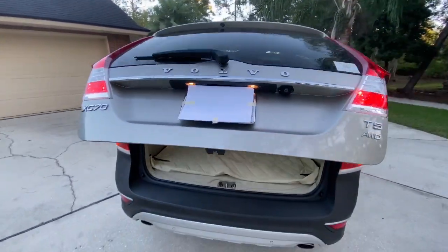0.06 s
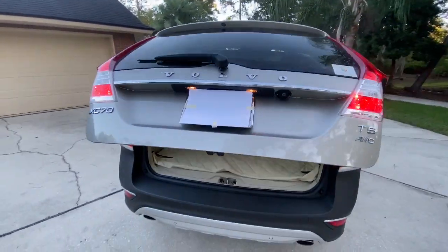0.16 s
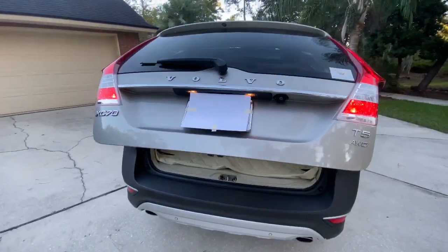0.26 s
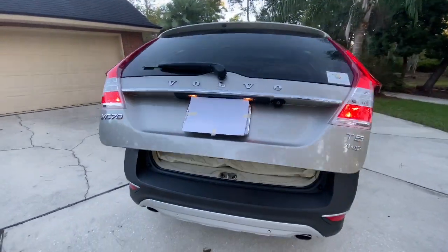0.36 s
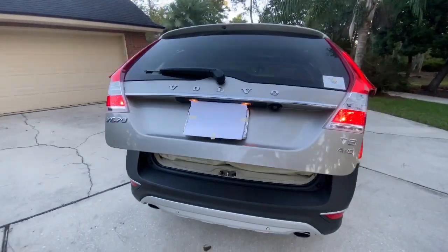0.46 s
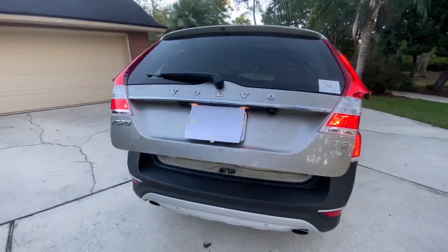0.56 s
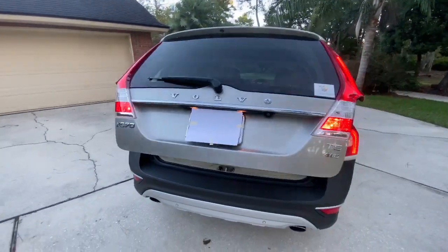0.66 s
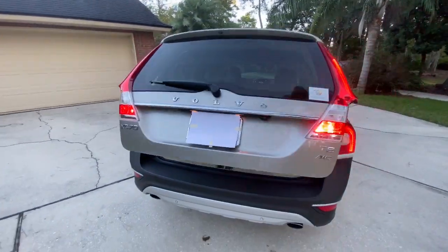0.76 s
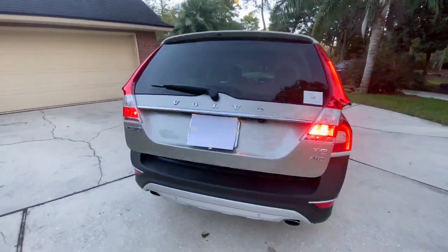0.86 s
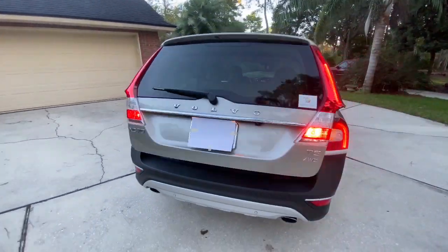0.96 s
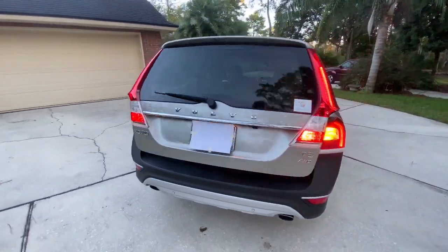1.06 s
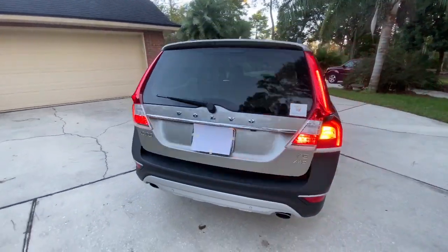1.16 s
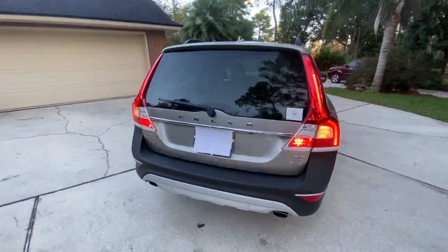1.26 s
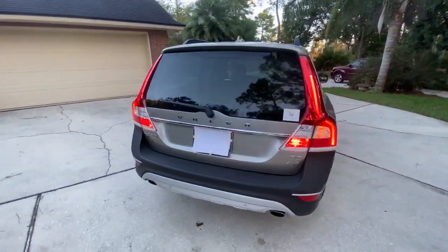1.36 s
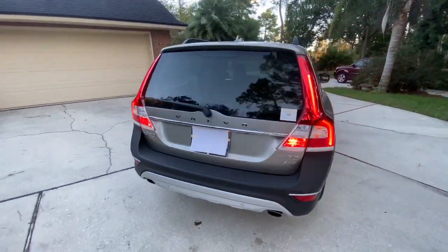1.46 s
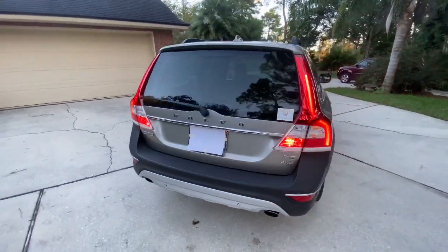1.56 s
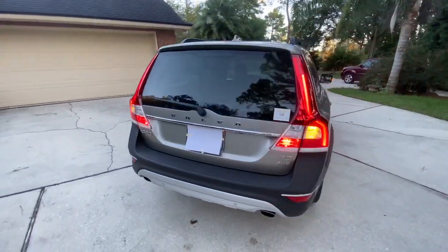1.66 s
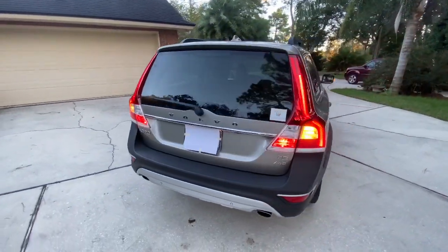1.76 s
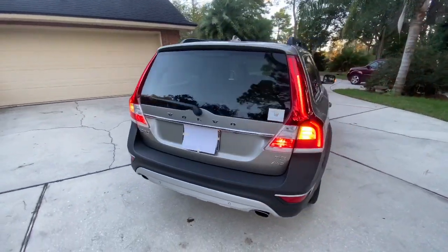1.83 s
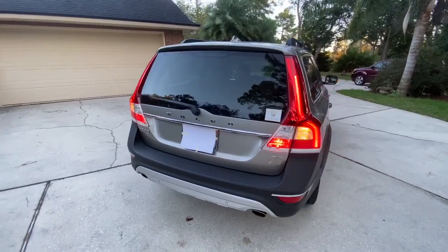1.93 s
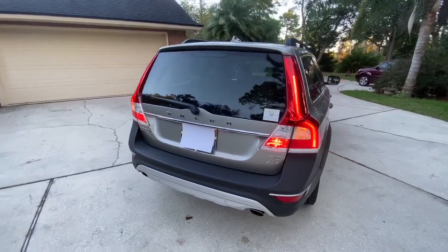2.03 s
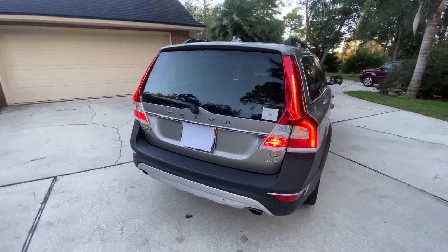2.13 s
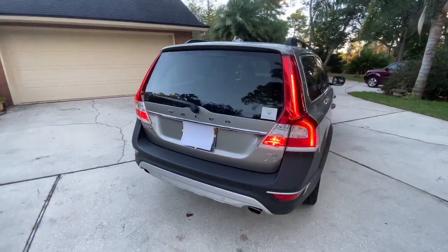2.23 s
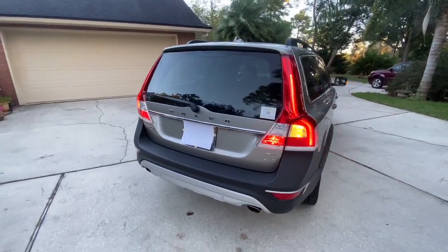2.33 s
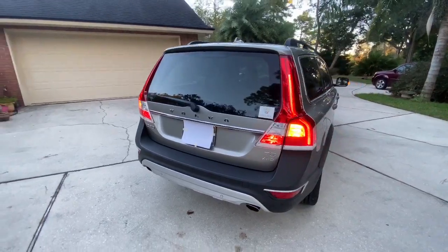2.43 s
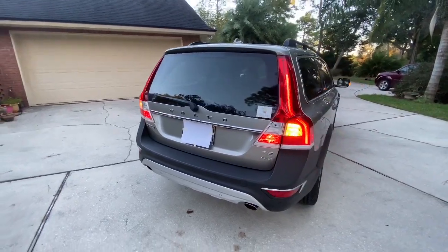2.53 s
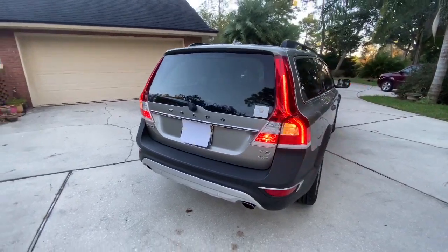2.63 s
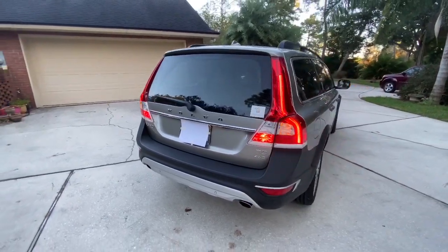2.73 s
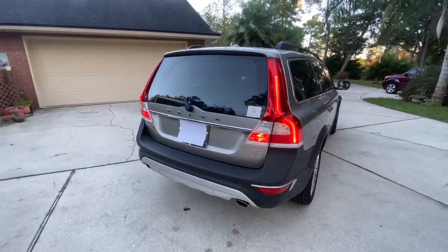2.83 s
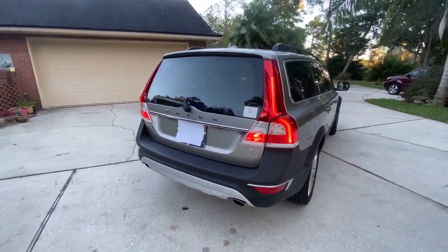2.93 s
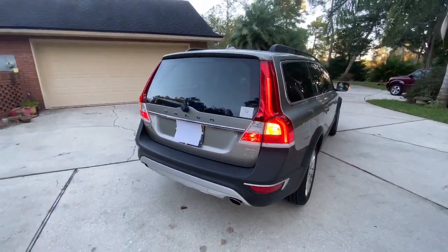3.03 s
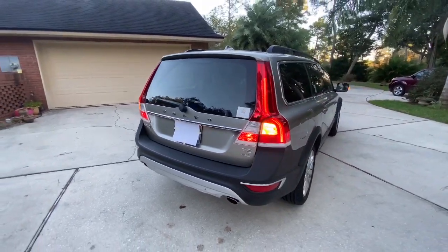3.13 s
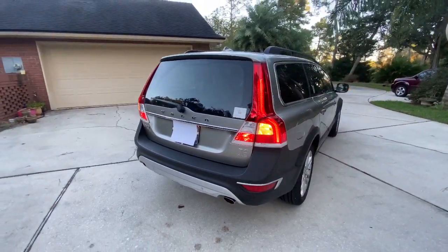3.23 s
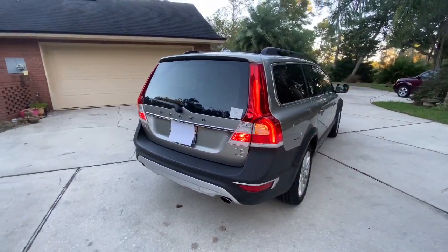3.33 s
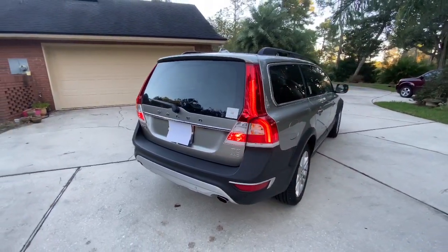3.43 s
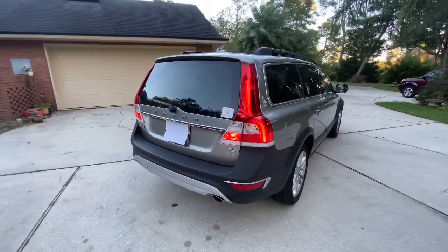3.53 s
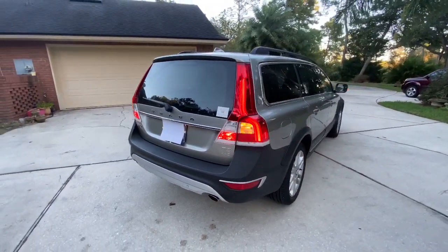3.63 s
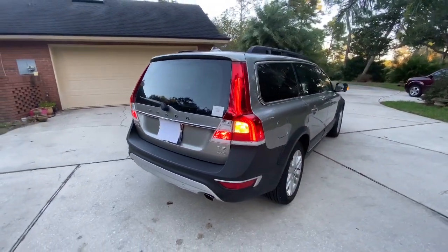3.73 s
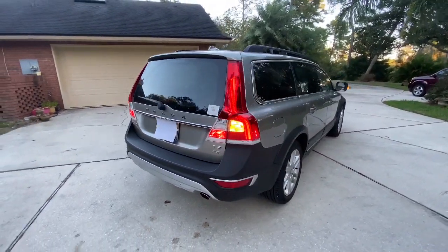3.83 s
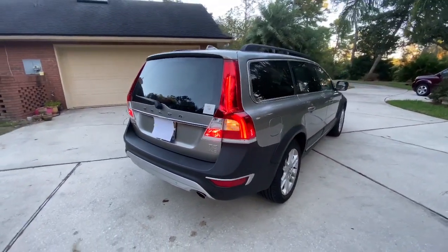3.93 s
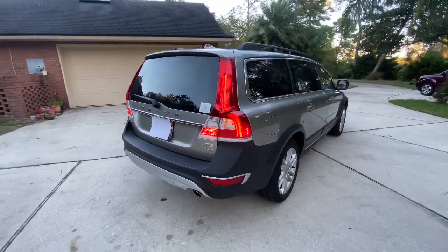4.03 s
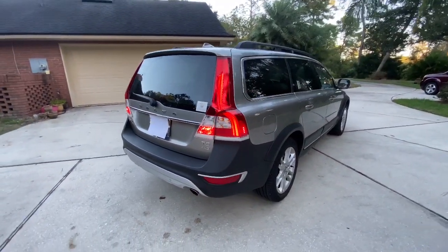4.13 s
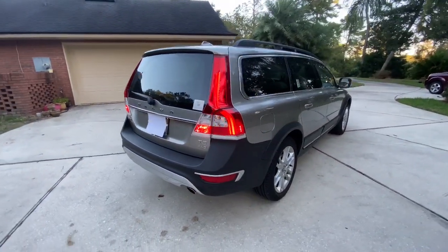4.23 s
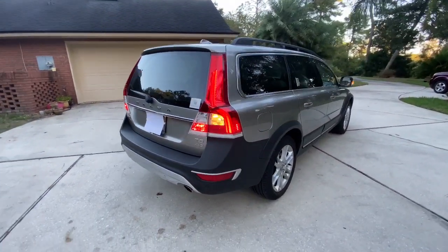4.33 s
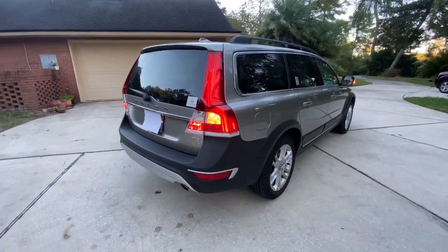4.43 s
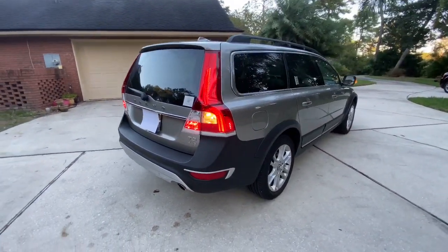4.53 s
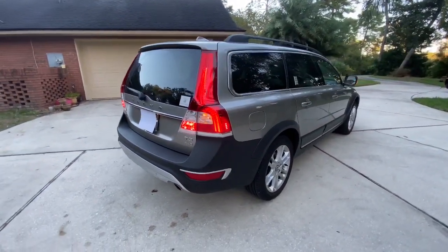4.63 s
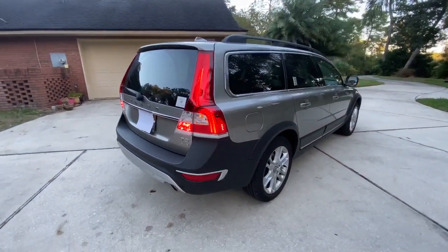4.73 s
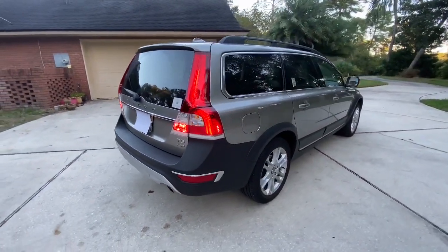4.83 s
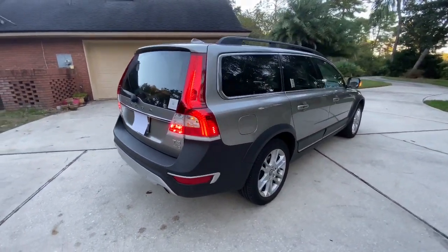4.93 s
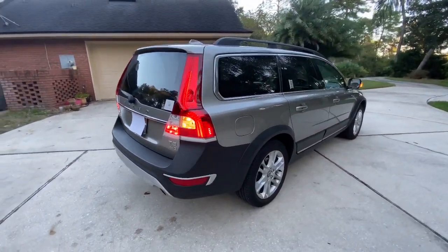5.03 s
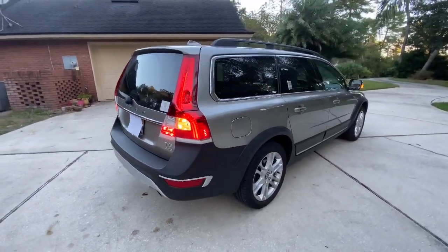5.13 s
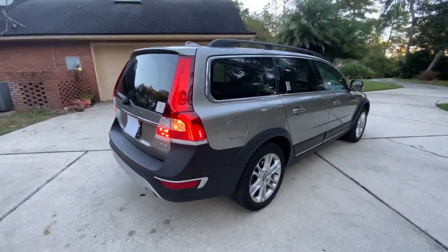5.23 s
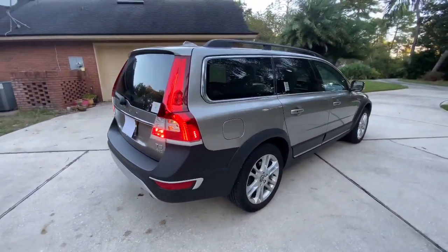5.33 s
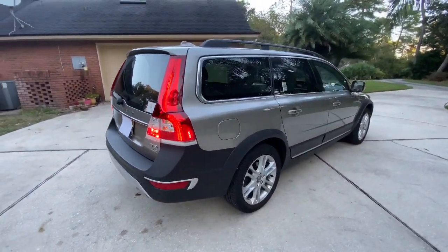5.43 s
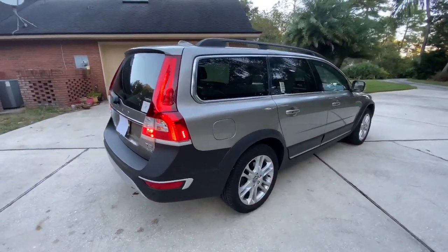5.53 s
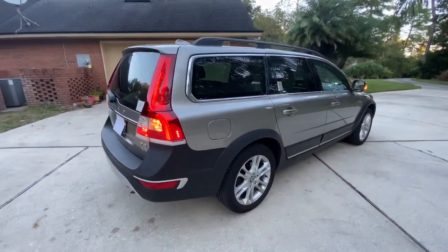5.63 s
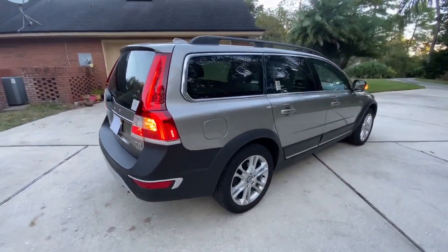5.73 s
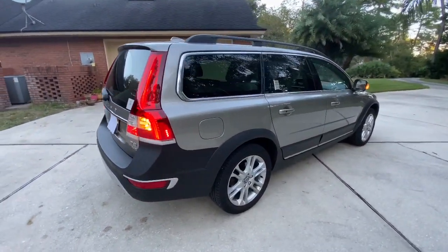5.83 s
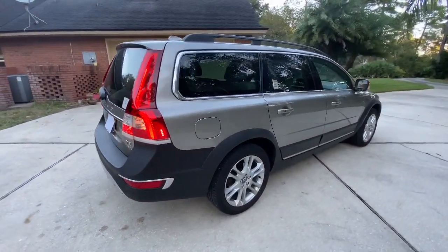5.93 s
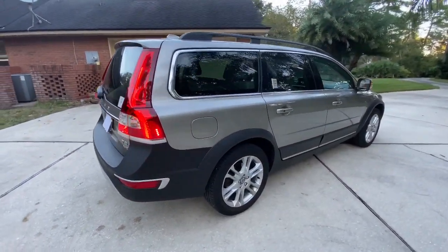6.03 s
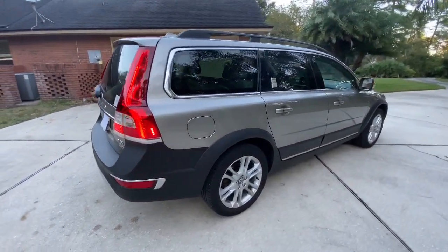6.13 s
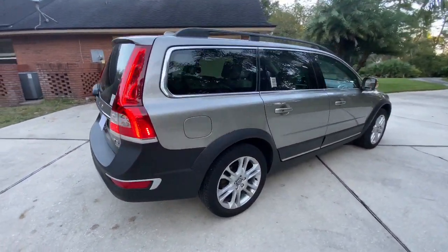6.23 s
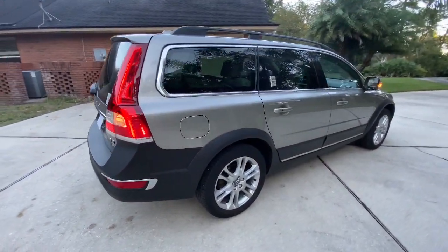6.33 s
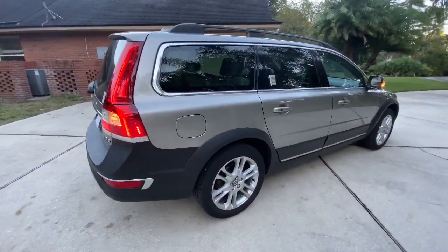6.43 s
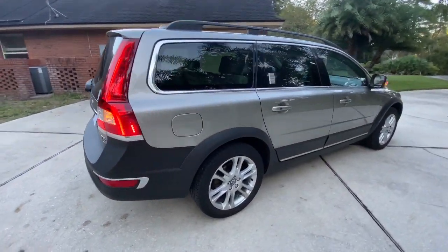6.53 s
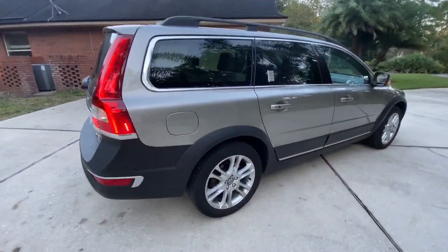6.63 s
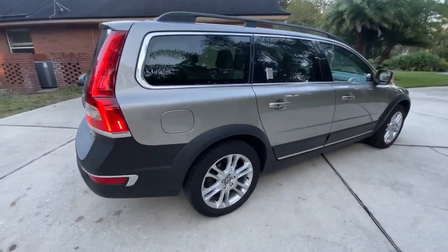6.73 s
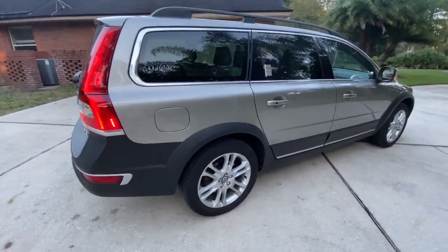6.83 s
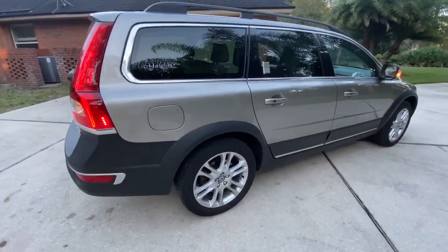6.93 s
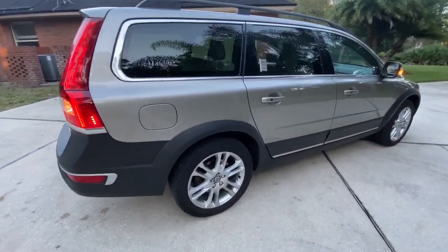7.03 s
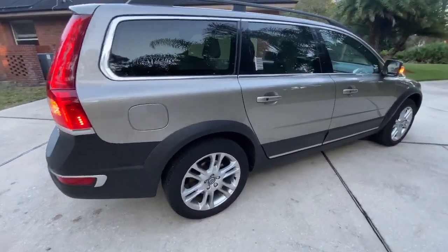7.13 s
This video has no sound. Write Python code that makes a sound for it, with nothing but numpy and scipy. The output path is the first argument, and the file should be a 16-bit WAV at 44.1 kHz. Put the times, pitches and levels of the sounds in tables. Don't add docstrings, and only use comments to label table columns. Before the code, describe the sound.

Outdoors, a low engine purr underlies a short electric motor whine and one solid tailgate thud, followed by steady idling that grows hissier.

```python
import sys
import numpy as np
from scipy import signal
from scipy.fft import rfft, irfft, next_fast_len
from scipy.io import wavfile

SR = 44100
rng = np.random.default_rng(int(sys.argv[2]) if len(sys.argv) > 2 else 0)


def file_out(sig):
    cols = np.atleast_2d(sig).T
    lim = np.clip(cols, -1, 1)
    pcm = np.round(lim * 32767).astype(np.int16)
    wavfile.write(sys.argv[1], SR, pcm)


def decibels_to_gain(level_db):
    exponent = np.asarray(level_db, float) / 20
    return 10 ** exponent


N = 316188
TIME = np.arange(N) / SR
PAD = next_fast_len(N + SR // 2)
HZ = np.maximum(np.arange(PAD // 2 + 1) * SR / PAD, 1)
FIRING_HZ, CYLINDERS = 29.93, 5


def in_time(rows):
    start_s, *columns = np.transpose(rows)
    return [np.interp(TIME, start_s, column) for column in columns]


def at_hz(points, hz, axis=1):
    points = np.array(points)
    return np.interp(np.log(hz), np.log(points[:, 0]), points[:, axis])


def rms_one(x):
    return x / np.sqrt(np.mean(x ** 2) + 1e-20)


def total_db(points):
    return 10 * np.log10(np.mean(decibels_to_gain(2 * at_hz(points, HZ))))


def drift(rate_hz):
    r = np.exp(-128 * np.pi * rate_hz / SR)
    chance = rng.standard_normal(N // 64 + 3002)
    slow = signal.lfilter([1], [1, -2 * r, r * r], chance)[3000:]
    return np.interp(np.arange(N) / 64, np.arange(len(slow)), rms_one(slow - slow.mean()))


def resonance(hz, width_hz):
    return 1 / (1 + (2 * (HZ - hz) / width_hz) ** 2)


# pitch_hz, in_phase [-1..1], quarter_cycle_ahead [-1..1]
LINK = [(60, 0.15, 0.71), (150, 0.3, 0.47), (300, 0.096, -0.43), (600, 0.49, -0.15), (890, -0.27, -0.53),
        (1290, 0.41, -0.59), (1800, 0.65, -0.3), (2500, 0.39, -0.19), (3500, 0.11, -0.03),
        (5200, 0.56, 0.11), (7000, 0.079, -0.08), (10000, -0.12, 0.12)]


def side_of(mid, other):
    link = at_hz(LINK, HZ) + 1j * at_hz(LINK, HZ, axis=2)
    return link * mid + np.sqrt(np.clip(1 - abs(link) ** 2, 0, 1)) * other


def noise_pair():
    mid, other = rfft(rng.standard_normal((2, PAD)))
    return np.array([mid, side_of(mid, other)])


def in_samples(spectra):
    return irfft(spectra, PAD)[:, :N]


def tone(rows, wobble, flutter_db, side_db):
    hz, level_db = in_time(rows)
    phase = 2 * np.pi * np.cumsum(hz * (1 + wobble * drift(15))) / SR
    sounding = TIME < rows[-1][0]
    gain = np.sqrt(2) * decibels_to_gain(level_db + flutter_db * drift(12)) * sounding
    return gain * np.array([np.sin(phase), decibels_to_gain(side_db) * np.sin(phase + 1.55)])


# multiple of the firing rate, level_db
EXHAUST = [(1, -7), (2, -5), (3, 0.5), (4, -8), (5, -7), (6, -18), (7, -14.5), (8, -20.5), (9, -28.5),
           (10, -26)]


def exhaust(note_db, side_db):
    crank = 2 * np.pi * FIRING_HZ * TIME + 0.25 * drift(0.29)
    note = np.zeros(N)
    for k, level_db in EXHAUST:
        lag = 0.32 + 1.82 * k - 1.14 * k * k
        unsteady_db = (0.1 + 0.28 * k) * drift(3.6)
        note += decibels_to_gain(level_db + unsteady_db) * np.cos(k * crank + lag)
    side = np.gradient(note) * SR / (2 * np.pi * 90) * decibels_to_gain(side_db - 6.5)
    return np.sqrt(2) * decibels_to_gain(note_db) * np.array([note, side])


# pitch_hz, level_db [dB per Hz]
RUMBLE = [(20, -14), (40, -19), (55, -7), (80, -9.5), (105, -5), (160, -8.5), (200, -19), (260, -28)]


def rumble(rumble_db, side_db):
    colour = decibels_to_gain(at_hz(RUMBLE, HZ) - total_db(RUMBLE)) * (HZ < 400)
    mid, side = in_samples(noise_pair() * colour)
    return decibels_to_gain(rumble_db) * np.array([mid, decibels_to_gain(side_db) * side])


# pitch_hz, level_db
BEHIND = [(230, -78.5), (330, -81), (520, -83), (720, -89), (1150, -86.5), (1500, -91.5), (1850, -91.5),
          (2500, -98), (4200, -96.5), (6000, -106), (8000, -113), (10200, -111), (12000, -112),
          (15000, -119)]
BEHIND_SIDE = [(230, -88), (400, -90), (600, -86.5), (1000, -91), (1550, -92.5), (2100, -91.5), (2600, -99),
               (3100, -98), (4500, -101), (5700, -101), (8000, -113), (10000, -112), (12500, -116),
               (14000, -116)]
CORNER = [(230, -73), (330, -83), (520, -88), (720, -81), (1150, -90.5), (1500, -81), (1850, -91.5),
          (2500, -98.5), (4200, -96), (6000, -100), (8000, -107), (10200, -109), (12000, -107),
          (15000, -115)]
CORNER_SIDE = [(230, -91), (400, -91), (600, -84.5), (1000, -93.5), (1550, -81), (2100, -86), (2600, -100),
               (3100, -94), (4500, -100), (5700, -99), (8000, -107), (10000, -110), (12500, -109),
               (14000, -111)]
BESIDE = [(230, -75.5), (330, -73.5), (520, -91.5), (720, -86), (1150, -82.5), (1500, -79.5), (1850, -89),
          (2500, -88), (4200, -96.5), (6000, -91.5), (8000, -102), (10200, -103), (12000, -95),
          (15000, -108)]
BESIDE_SIDE = [(230, -90), (400, -88), (600, -88), (1000, -85), (1550, -76.5), (2100, -83.5), (2600, -92),
               (3100, -86), (4500, -98), (5700, -91.5), (8000, -101), (10000, -104), (12500, -101),
               (14000, -104)]
# pitch_hz, width_hz, level_db
UNDERBODY = [(892, 380, 4.5), (2125, 440, 4.5), (3020, 1680, -2.5), (5570, 230, -0.5), (6030, 400, 3),
             (9300, 360, -11.5)]


def engine_bay(place, hiss_db):
    stations = [(BEHIND, BEHIND_SIDE), (CORNER, CORNER_SIDE), (BESIDE, BESIDE_SIDE)]
    colours = np.array([[at_hz(points, HZ) for points in pair] for pair in stations])
    middle = colours.mean(axis=0)
    change = colours - middle
    for hz, width_hz, level_db in UNDERBODY:
        middle[0] += level_db * resonance(hz, width_hz)
    spectrum = noise_pair() * decibels_to_gain(middle) * np.sqrt(SR / 2)
    out = np.zeros((2, N))
    band_of = 3.5 * np.log2(HZ / 200)
    for k in range(24):
        window = np.clip(1 - abs(band_of - k), 0, 1)
        slide_db = (change * window).sum(axis=-1) / window.sum()
        gain_db = [np.interp(place, np.arange(len(stations)), db) for db in slide_db.T]
        breath_db = 1.32 * drift(1.22) + drift(7.8)
        out += in_samples(spectrum * window) * decibels_to_gain((gain_db + breath_db).astype(np.float32))
    firing = 1 + 0.085 * np.cos(2 * np.pi * FIRING_HZ * TIME + 2.6)
    return out * decibels_to_gain(hiss_db) * firing


# pitch_hz, width_hz, behind_db, beside_db, side_db
WHIRRS = [(76.8, 3.8, -50.5, -49.5, -10.5), (594, 17, -70.5, -74.5, 0), (1583, 48, -67, -56, 3.5),
          (1800, 15, -77.5, -74, -1), (212.6, 8.2, -64.5, -57, -14), (909, 26, -69, -65, 1),
          (5350, 240, -72, -78, 2)]


def whirrs(beside):
    out, pair = np.zeros((2, N)), noise_pair()
    for hz, width_hz, behind_db, beside_db, side_db in WHIRRS:
        mid, side = in_samples(pair * resonance(hz, width_hz))
        level_db = behind_db + beside * (beside_db - behind_db)
        out += decibels_to_gain(level_db) * np.array([rms_one(mid), decibels_to_gain(side_db) * rms_one(side)])
    return out


def valve(beside):
    cycle = 2 * np.pi * FIRING_HZ / CYLINDERS * TIME - 1.15
    puff = np.exp(1.4 * (np.cos(cycle) - 1)) * decibels_to_gain(1.2 * drift(3.6))
    colour = 1 / (1 + ((HZ - 3600) / 350) ** 4) + 0.33 / (1 + ((HZ - 5300) / 400) ** 4)
    mid, side = in_samples(noise_pair() * colour)
    return decibels_to_gain(-67.5 + 1.2 * beside) * puff * np.array([rms_one(mid), decibels_to_gain(1.2) * rms_one(side)])


# start_s, shaft_hz, effort_db
LOWERING = [
    (0, 249.8, 0),
    (.12, 247, -8),
    (.21, 258.3, 1),
    (.4, 272, -3),
    (.6, 283, -2),
    (.75, 290, -18),
]
# multiple of the shaft, level_db, fade_db_per_s, side_db
LOWERING_LINES = [(2.35, -54, -16, -11), (1.005, -52, -6, -18), (4.21, -59, -17, -2)]
# start_s, shaft_hz, effort_db
PULL_IN = [
    (.6, 671, -40),
    (.75, 715, -3),
    (.95, 774, 0),
    (1.2, 790, 0),
    (1.23, 790, -30),
]
# multiple of the shaft, level_db, fade_db_per_s, side_db
PULL_IN_LINES = [(1.005, -69, 4, -11), (1.375, -77, 9, -2)]


def motor(curve, lines):
    start_s, shaft_hz, effort_db = np.transpose(curve)
    out = np.zeros((2, N))
    for multiple, level_db, fade_db_per_s, side_db in lines:
        line_db = level_db + effort_db + fade_db_per_s * start_s
        rows = np.transpose([start_s, multiple * shaft_hz, line_db])
        out += tone(rows, 0.008, 3.6, side_db)
    return out


# start_s, rattle_db, brightness_db [at 10 kHz], push_db [on the panels], push_direction [+1 or -1]
HITS = [(1.2309, -15, -36, -34, 1), (1.244, -20.5, -30, -27, -1), (1.2498, -13, 0, -31, -1),
        (1.263, -21, -21, -14.5, 1), (1.272, -10.5, -10.5, -13.5, -1), (1.278, -9, -25, -16.5, -1),
        (1.2855, -28, -31, -13.5, 1), (1.295, -27, -14, -26, 1), (1.321, -37, -2.5, -29, 1),
        (1.358, -43, -1, -30.5, -1), (1.395, -46, -3, -34.5, 1), (1.4247, -41, -12, -39, 1),
        (1.441, -37, -31, -30, -1), (1.485, -45, -10.5, -40, 1), (1.505, -54, -10, -36, -1),
        (1.547, -47, -10, -42, 1), (1.6095, -58, -9, -42.5, 1)]
# pitch_hz, level_db [dB per Hz]
RATTLE = [(120, -28), (200, 0.5), (490, -10), (601, -2), (899, -9), (1140, -6.5), (1500, -7), (2090, -9),
          (3300, -27), (4430, -21.5), (8580, -39), (11500, -31.5), (16000, -44)]


def rattle():
    click_db = 2.5 * np.minimum(rng.exponential(1, N), 3)
    grains = rms_one(rng.standard_normal((2, N)) * decibels_to_gain(click_db) * (rng.random(N) < 0.4))
    dull, bright = np.zeros(N), np.zeros(N)
    for start_s, level_db, bright_db, _, _ in HITS:
        start = round(start_s * SR)
        span = slice(start, start + SR // 2)
        age_s = TIME[span] - TIME[start]
        t60_s = 0.035 - 0.0017 * level_db
        shape = (1 - np.exp(-age_s / 0.0019)) * decibels_to_gain(level_db - 60 * age_s / t60_s)
        dull[span] += shape
        bright[span] += shape * decibels_to_gain(bright_db)
    treble = HZ ** 2 / (HZ ** 2 + 5000 ** 2)
    colour = decibels_to_gain(at_hz(RATTLE, HZ) - total_db(RATTLE))
    low_part = (1 - treble) * rfft(grains * dull, PAD)
    high_part = treble * decibels_to_gain(15.5) * rfft(grains * bright, PAD)
    mid, other = colour * (low_part + high_part)
    side_tilt = decibels_to_gain(-2.5) * HZ ** 2 / (HZ ** 2 + 290 ** 2)
    side = side_tilt * (0.72 / np.hypot(1, HZ / 4000) * mid + other)
    return in_samples(np.array([mid, side]))


# pitch_hz, level_db, t60_s
PANELS = [(60.3, -1, 0.22), (72, 4.5, 0.18), (98.4, 0.5, 0.12), (129, -0.5, 0.078), (167, -4.5, 0.15),
          (184.6, -6.5, 0.17), (250.7, -3, 0.11), (290, -1.5, 0.062), (342, -10, 0.11), (405, -13, .07),
          (583, -10.5, 0.086), (637, -18, 0.043), (792, -8.5, 0.082), (1155, -19, 0.079),
          (1934, -4.5, 0.032), (4500, -26, 0.06), (5630, -27, 0.05)]


def panels():
    start_s, rattle_db, _, push_db, direction = np.transpose(HITS)
    at = np.round(start_s * SR).astype(int)
    chance_db = rng.normal(0, 2.7, (len(PANELS), len(HITS)))
    out = np.zeros((2, N))
    for (hz, level_db, t60_s), luck_db in zip(PANELS, chance_db):
        big = hz < 500
        late = round(0.00274 * SR) if big else 0
        force_db = push_db if big else rattle_db
        pushes = np.full(N, 1e-18)
        pushes[at + late] = decibels_to_gain(force_db + level_db + luck_db) * np.sign(direction)
        soft = np.exp(-2 * np.pi * 1.6 * hz / SR)
        pushes = signal.lfilter([1 - soft], [1, -soft], pushes) * decibels_to_gain(1.5)
        r, w = decibels_to_gain(-60 / (t60_s * SR)), 2 * np.pi * hz / SR
        ring = signal.lfilter([0, np.sin(w)], [1, -2 * r * np.cos(w), r * r], pushes)
        side_db = min(-30 + 4.6 * np.log2(hz / 60), -2.5)
        out += ring * [[1], [decibels_to_gain(side_db)]]
    return out


def wall_tail(mid):
    tail_db, t60_s, delay_s = -23.5, 0.43, 0.012
    age_s = np.arange(SR) / SR
    echo = rng.standard_normal((2, SR)) * decibels_to_gain(-60 * age_s / t60_s) * (age_s > delay_s)
    echo = echo / np.sqrt((echo ** 2).sum(axis=1, keepdims=True))
    dulling = HZ / np.hypot(HZ, 300) / np.hypot(1, HZ / 4000)
    return decibels_to_gain(tail_db) * in_samples(rfft(mid, PAD) * rfft(echo, PAD) * dulling)


def tailgate():
    high_pass = signal.butter(3, 56, "high", fs=SR, output="sos")
    thud = signal.sosfilt(high_pass, rattle() + panels())
    return thud + wall_tail(thud[0])


# start_s, pitch_hz, level_db
REBOUND = [
    (1.42, 78, -70),
    (1.47, 76, -37),
    (1.53, 66, -36),
    (1.64, 62, -55),
]


def rebound():
    return tone(REBOUND, 0.03, 1.5, -24)


# start_s, level_db [of the swell that follows]
FADES = [(-.15, -72), (.45, -81), (.85, -73.5), (1.48, -80), (1.93, -77), (2.27, -73.5), (2.73, -76),
         (2.86, -74), (3.48, -82), (3.88, -78), (4.21, -79), (4.8, -87), (5.3, -79), (5.72, -81),
         (6.05, -81), (6.36, -76), (6.58, -81), (6.9, -79), (7.2, -82)]


def whistle():
    pitch_hz, creep_hz_per_s, reflected_share = 10002, 2.1, 0.83
    null_s, swell_db = np.transpose(FADES)
    path = np.interp(TIME, null_s, 2 * np.pi * np.arange(len(null_s)))
    between_s = (null_s[1:] + null_s[:-1]) / 2
    beating = abs(1 - reflected_share * np.exp(1j * path))
    swell = decibels_to_gain(np.interp(TIME, between_s, swell_db[:-1])) * beating
    end_s = N / SR
    rows = [(0, pitch_hz, 0), (end_s, pitch_hz + creep_hz_per_s * end_s, 0)]
    return swell * tone(rows, 0.00029, 1.1, -2.5)


# low_hz, high_hz
MID_GAPS = [(12450, 14000), (15800, 30000)]
SIDE_GAPS = [(10350, 12000), (14450, 30000)]


def treble_gaps(mid_side):
    gain = []
    for gaps in (MID_GAPS, SIDE_GAPS):
        in_gap = sum((HZ > low_hz) & (HZ < high_hz) for low_hz, high_hz in gaps)
        gain.append(decibels_to_gain(-24 * in_gap))
    return in_samples(rfft(mid_side, PAD) * gain)


# start_s, place [0 behind, 1 at the corner, 2 beside the car], near_db
WALK = [(0, 0.044, 0.2), (1.7, 0, .8), (2.3, 0, 0.6), (2.8, 0.28, 1.5), (3.7, 0.73, 0), (4.2, 1.17, -.3),
        (5.2, 1.49, -1), (6.2, 1.87, -2), (7.17, 2.1, .5)]
# peak_s, level_db
RUMBLE_SWELLS = [(1.0, 7), (1.5, 6), (2.2, 5), (6.2, 4)]


def scene():
    place, near_db = in_time(WALK)
    beside = place / 2
    low_side_db = -21 + 5.8 * place
    rumble_swell_db = sum(db * np.exp(-((TIME - s) / 0.16) ** 2) for s, db in RUMBLE_SWELLS)
    rumble_db = -43.5 - 2.5 * place + rumble_swell_db
    hiss_db = 0.39 + 0.14 * place ** 2 + 0.15 * near_db
    engine = exhaust(-41.5 + near_db, low_side_db) + rumble(rumble_db, low_side_db)
    engine += engine_bay(place, hiss_db) + whirrs(beside) + valve(beside)
    gate = motor(LOWERING, LOWERING_LINES) + motor(PULL_IN, PULL_IN_LINES) + tailgate() + rebound()
    mid, side = treble_gaps(engine + gate + whistle())
    return np.array([mid + side, mid - side])


def top_cut(x):
    return signal.sosfilt(signal.butter(12, 16660, fs=SR, output="sos"), x)


def record(dry):
    mix = 1.019 * np.tanh(dry / 1.086)
    return top_cut(mix)


dry = scene()
out = record(dry)
file_out(out)
```